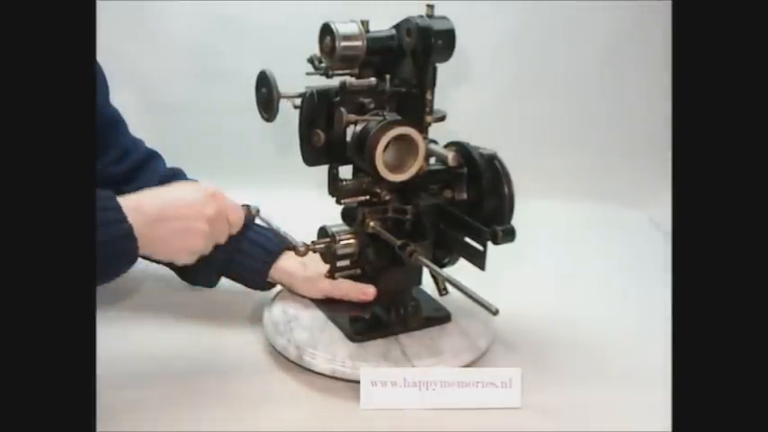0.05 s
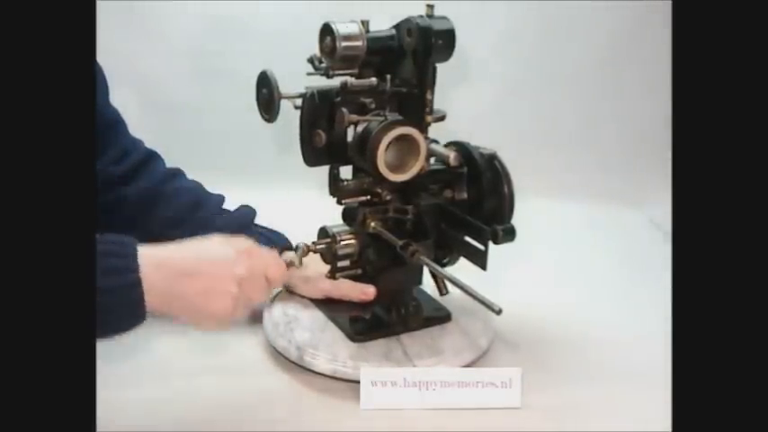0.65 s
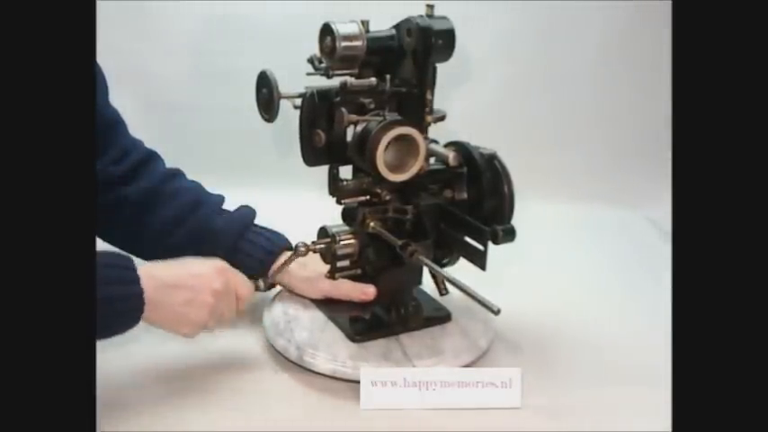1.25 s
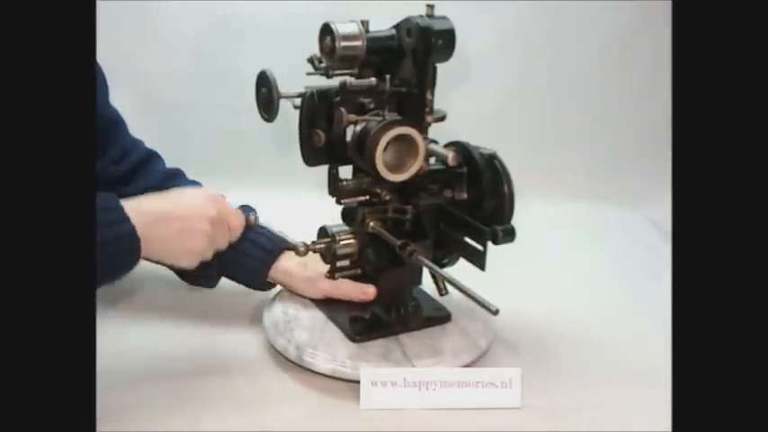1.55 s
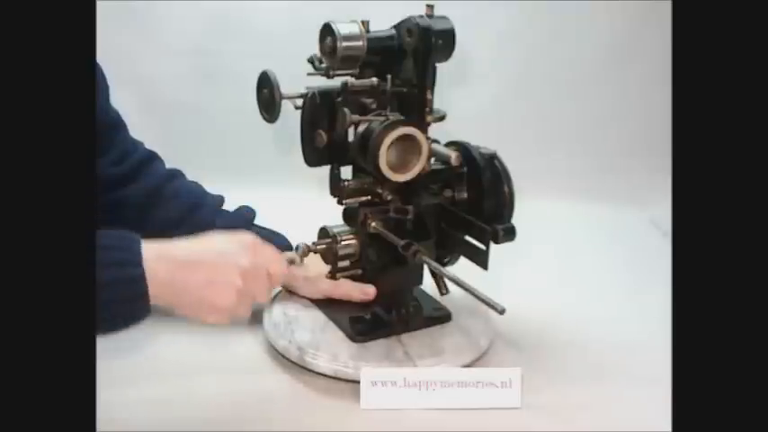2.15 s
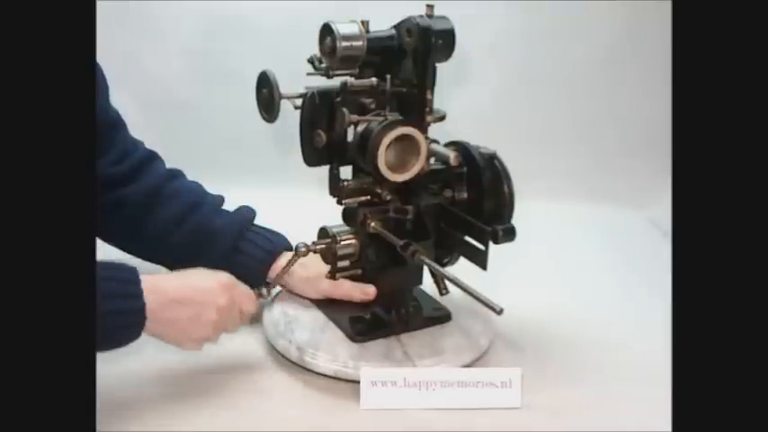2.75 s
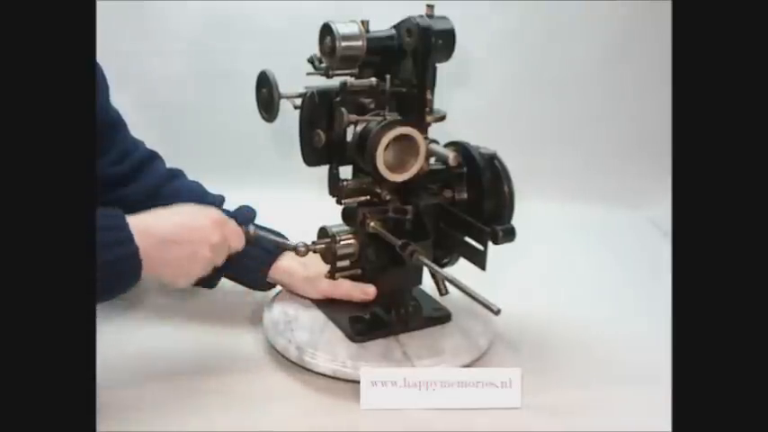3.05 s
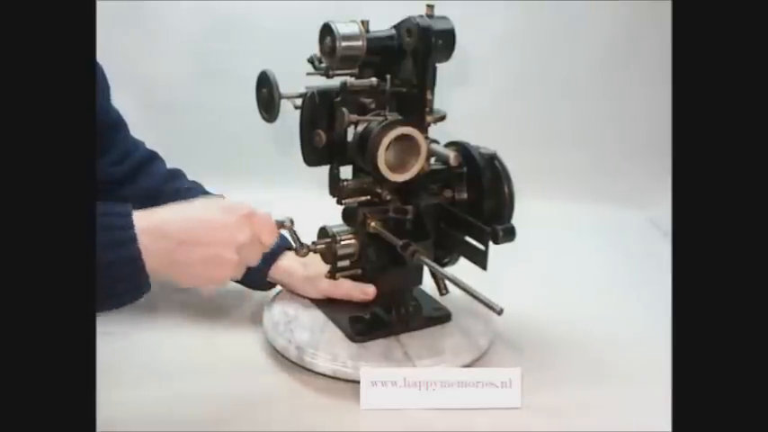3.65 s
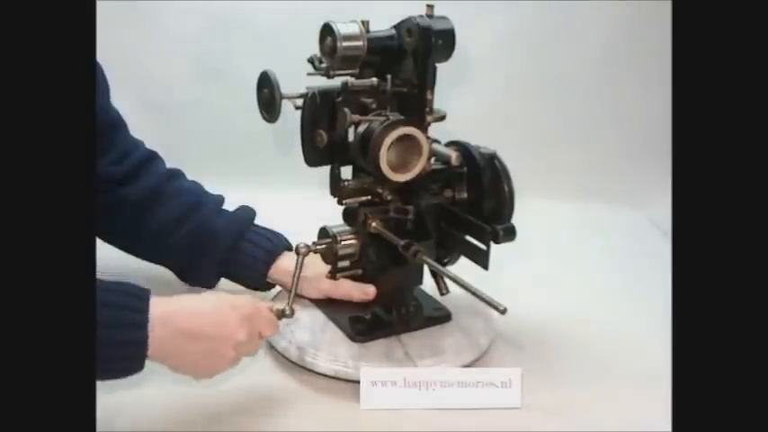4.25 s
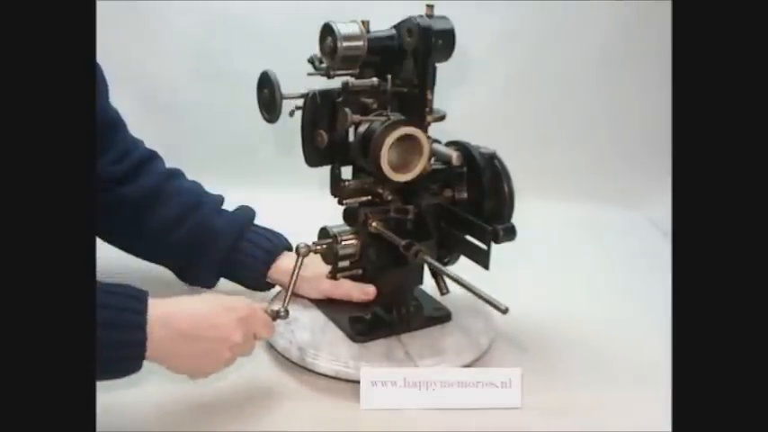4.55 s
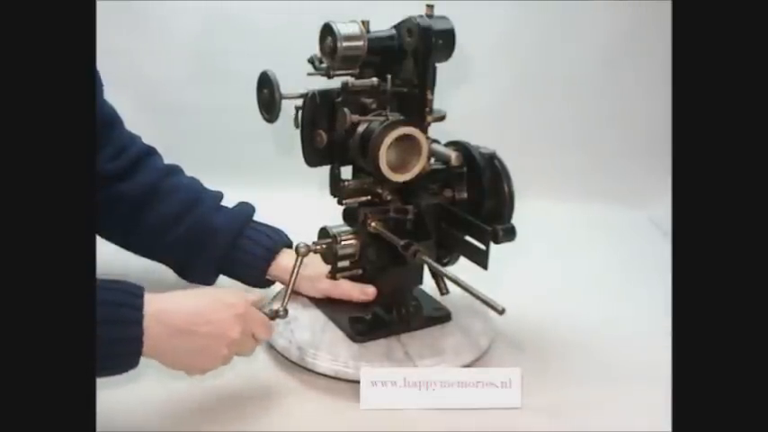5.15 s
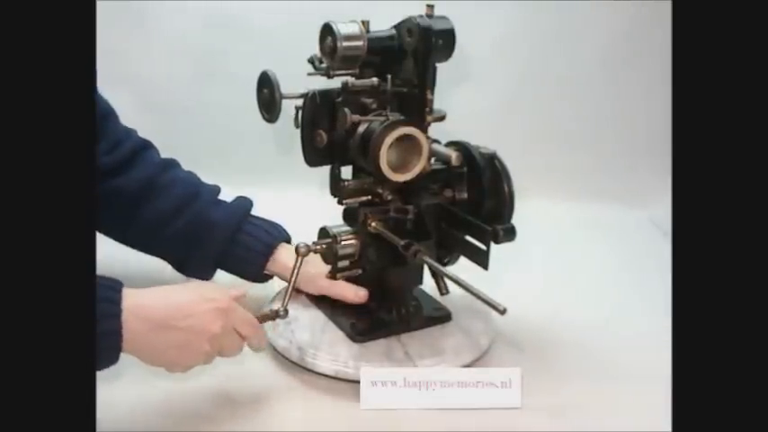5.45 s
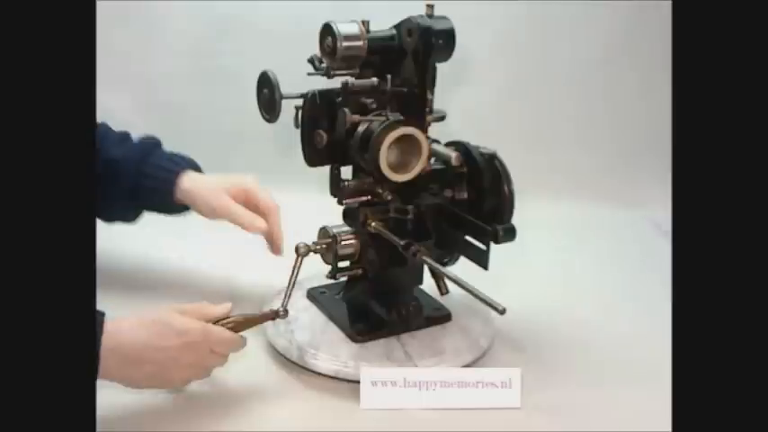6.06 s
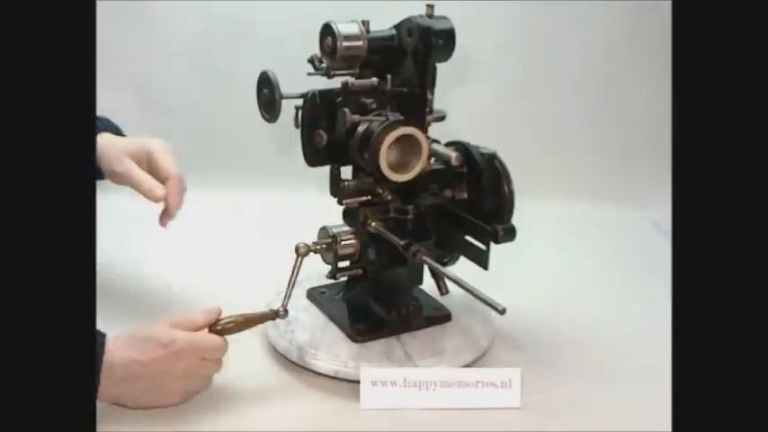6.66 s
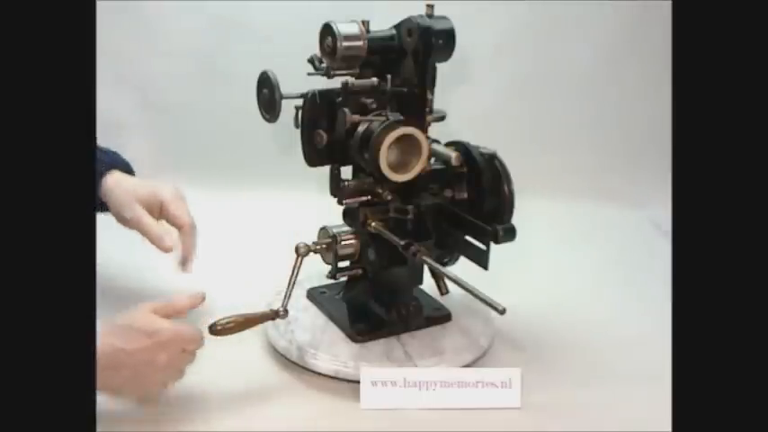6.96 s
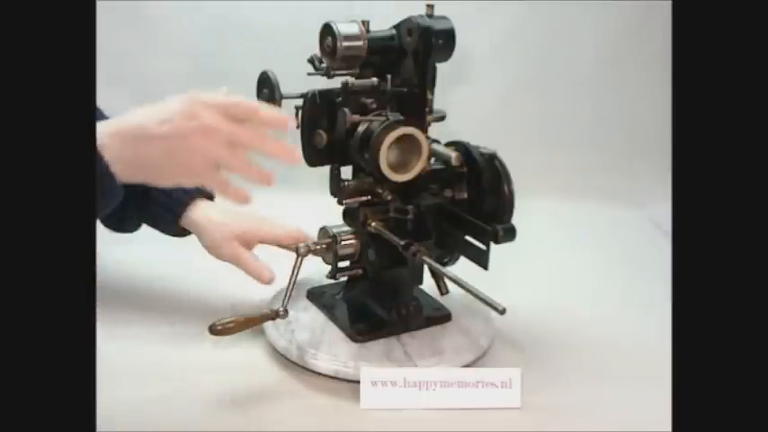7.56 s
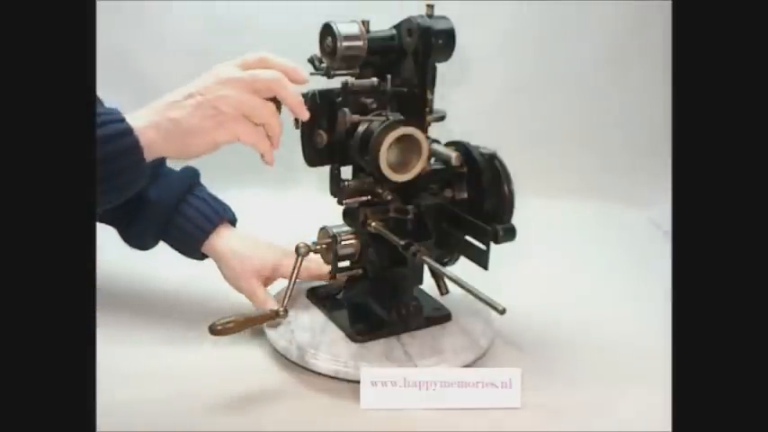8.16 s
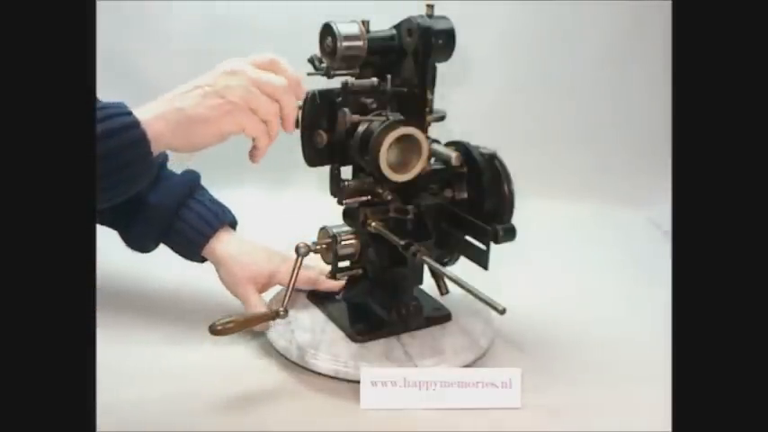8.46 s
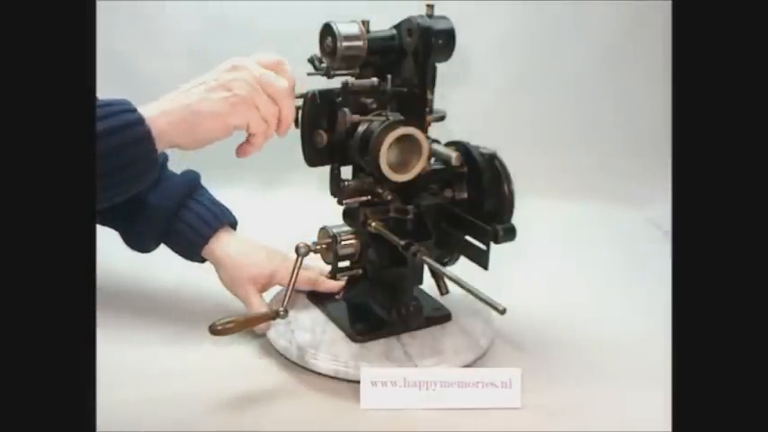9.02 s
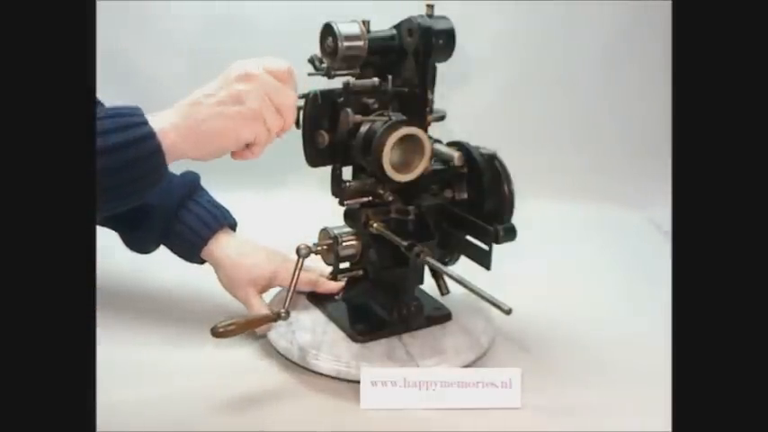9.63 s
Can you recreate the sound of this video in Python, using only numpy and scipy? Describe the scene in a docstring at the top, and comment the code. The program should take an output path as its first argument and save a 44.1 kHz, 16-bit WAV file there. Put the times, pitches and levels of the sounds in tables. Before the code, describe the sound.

Close up in a small room, an old hand-cranked projector runs with a surging gear whir and quick, even metallic ticking, its base thumping lightly as it rocks. The ticking slows and stops after about four seconds. A soft brush of skin and sleeve follows, then one sharper metal clack, several light taps and a late dull bump. Faint rumble, hiss, hum and a thin electronic whine lie underneath.

```python
"""Hand-cranked film projector

A cast-iron projector runs on a table in a small room. Gear teeth whir and rasp; five times a second
a pin ticks into the star wheel, which knocks on its lock. Once a crank turn a tight spot scuffs and
the base thumps. The machine runs down, then hands brush and tap it and let the gears rock in their
play. Under it all lie room rumble, hiss, a faint hum and a thin electronic whine."""
import sys
import numpy as np
from scipy import signal
from scipy.fft import rfft, irfft
from scipy.io import wavfile
from scipy.ndimage import uniform_filter1d

SR = 44100
rng = np.random.default_rng(int(sys.argv[2]) if len(sys.argv) > 2 else 0)


def log_audio(samples):
    """Write samples as a 16-bit WAV file to the path given in sys.argv[1]."""
    # one column per channel
    frames = np.atleast_2d(samples).T
    # limit to full scale, then quantise
    limited = np.clip(frames, -1, 1)
    pcm = np.round(limited * 32767).astype(np.int16)
    wavfile.write(sys.argv[1], SR, pcm)


N = 431738
TIME = np.arange(N) / SR
CUTOFF_HZ = 15720

# drive strokes: (time [s], tick [dB], knock [dB], lull depth [dB], surge height [dB])
STROKES = [(0.0912, -33, -45, 7.5, 1.5), (0.2924, -32.5, -46, 1, 3.0), (0.488, -37, -41, 4.5, 7),
           (0.6863, -33.5, -41, 2, 6), (0.8844, -30.5, -45, 3, -0.5), (1.0773, -34.0, -38.5, 1.5, -0.5),
           (1.2726, -39, -37, 8, 3.5), (1.4764, -34, -36.5, 5.5, 6.5), (1.677, -32.0, -41.0, 4.5, 5),
           (1.8684, -33, -39.5, 1.0, -1), (2.0552, -35.5, -37.5, 5, 1), (2.242, -33, -37.5, 1.5, 3.5),
           (2.4239, -31.5, -37.5, 3.5, 4), (2.601, -38.0, -37.5, -0.5, 2.5), (2.7866, -38.0, -38, 4.5, 6),
           (2.9878, -35, -36, 2, -3), (3.2048, -35.5, -38, 7.5, 5.5), (3.4227, -34.5, -41, 5, 8.0),
           (3.6359, -33.5, -42, 7, 5), (3.8526, -36, -36.5, 6, -2.5), (4.08, -38.5, -43, -1, 4),
           (4.3452, -43, -48.0, 3, -4)]
# iron frame: (frequency [Hz], width [Hz], gear-driven level [dB], knock-driven level [dB])
FRAME_MODES = [(148, 50, -23.5, -30), (256, 27, -15, -19), (362.5, 36, -9.5, -17), (435.5, 30.4, 4.5, 3.5),
               (475.4, 45.5, 4, 6.5), (604.5, 19, -7, 0), (683, 13.5, -10.5, 1), (774, 27.4, 2, 3.5),
               (841.6, 27.6, 4.5, 7.5), (894, 23.4, 1, -14), (929.3, 17.4, 2.5, 2), (1050, 45, -8, 6),
               (1152, 23, -15.5, -2.5), (1198, 29, -27, -22), (1396, 29, -12.5, -2.5), (1470, 28, -11, 4),
               (1548, 41, -15.5, 3), (1656, 113, -17, -5.5), (1954, 83, -13.5, -10.5), (2140, 52, -14, -2),
               (2237, 44, -8.5, -2), (2290, 36, -20, -19), (2614, 30, -13.5, -34), (3657, 26, -18, -24),
               (4492, 66, -19, -12)]
# dense small resonances under a knock: (frequency [Hz], relative density [dB])
KNOCK_SPECTRUM = [(100, -26), (300, -9), (1000, 1), (2200, 1), (3300, -8), (5000, -17.5), (7000, -24),
                  (15000, -45.5)]


def from_db(db):
    """Decibels to gain."""
    return 10 ** (np.asarray(db) / 20)


def unit_power(x):
    """Scale to unit power."""
    return x / np.sqrt(np.mean(x ** 2) + 1e-20)


def even(x, span_s):
    """Hold unit power over a sliding span."""
    return x / np.sqrt(np.abs(uniform_filter1d(x ** 2, int(span_s * SR))) + 1e-12)


def drift(per_s):
    """Random wander, spread near 1."""
    return np.interp(TIME * per_s, np.arange(2000), rng.standard_normal(2000))


def add(track, start_s, sound):
    """Mix a sound in at a time."""
    at = int(np.clip(start_s * SR, 0, N - 1))
    track[at:at + len(sound)] += sound[:N - at]


def through(x, response):
    """Convolve with a response scaled to unit energy."""
    return signal.oaconvolve(x, response / np.linalg.norm(response))[:N]


def ring(x, modes, order=1):
    """Parallel damped modes of alternating sign; order 2 gives a softer swell and steeper skirts."""
    t, response = TIME[:SR // 2], 0
    for k, (hz, width_hz, db) in enumerate(modes):
        decay = np.pi * width_hz * np.sqrt(order)
        envelope = decay * (decay * t) ** (order - 1) * np.exp(-decay * t)
        response = response + (-1) ** k * from_db(db) * envelope * np.sin(2 * np.pi * hz * t)
    return through(x, response)


def colour(x, spectrum, size=8192):
    """Minimum-phase filter with the given spectral shape."""
    hz, db = np.transpose(spectrum)
    grid_hz = np.maximum(np.arange(size // 2 + 1) * SR / size, 1)
    magnitude = from_db(np.interp(np.log(grid_hz), np.log(hz), db))
    cepstrum = irfft(np.log(magnitude))
    cepstrum[1:size // 2] *= 2
    cepstrum[size // 2 + 1:] = 0
    return through(x, irfft(np.exp(rfft(cepstrum))))


def soften(x, cutoff_hz):
    """A soft contact carries little treble."""
    return signal.sosfilt(signal.butter(2, cutoff_hz, fs=SR, output="sos"), x + 1e-18)


def grains(per_s, spread_db):
    """Tiny random impacts of uneven size; unit power."""
    sizes = from_db(spread_db * np.minimum(rng.exponential(1, N), 4))
    signs = rng.choice([-1, 1], N)
    return unit_power(sizes * signs * (rng.random(N) < per_s / SR))


def blow(crack_db, t60_s):
    """One contact: a click, then decaying chatter."""
    t = TIME[:SR // 4]
    force = rng.standard_normal(len(t)) * from_db(-60 * t / t60_s)
    force[0] += from_db(crack_db)
    return force


def blows(rows, crack_db, t60_s):
    """Force of a series of contacts: (time [s], level [dB])."""
    force = np.zeros(N)
    for start_s, db in rows:
        add(force, start_s, from_db(db) * blow(crack_db, t60_s))
    return force


def room(x, t60_s=0.15, tail_db=-3, onset_s=0.0077):
    """Direct sound, near echoes and a short diffuse tail."""
    # near walls and table top: (delay [s], level [dB])
    echoes = [(.0062, -14.5), (0.011, -6.5), (0.014, -12.5), (0.0216, -19.5)]
    t = TIME[:SR // 2]
    tail = rng.standard_normal(len(t)) * from_db(-60 * t / t60_s) * (1 - np.exp(-t / onset_s))
    response = from_db(tail_db) * tail / np.linalg.norm(tail)
    response[0] = 1
    for delay_s, db in echoes:
        response[int(delay_s * SR)] += from_db(db)
    return through(x, response)


def background(floor_db=-67.28, hum_hz=121, hum_rms_db=-82.5, whine_hz=256):
    """Room rumble, hiss, hum and a whine whose partials are in phase, like a train of tiny spikes."""
    # still room and hiss: (frequency [Hz], relative density [dB])
    floor_spectrum = [(12, -44), (20, 0), (49, -2), (90, -4.5), (112, -1.5), (144, -6.5), (298, -8),
                      (400, -11), (560, -11.5), (760, -17), (1200, -20), (2500, -22), (5230, -20.5),
                      (9660, -18.5), (15500, -24.5)]
    # envelope of the whine's partials: (frequency [Hz], RMS level [dB])
    whine_spectrum = [(7000, -98), (7680, -89), (7936, -100), (9216, -88), (9728, -84), (9984, -84),
                      (10400, -84.5), (11264, -97), (11520, -88), (12900, -87), (13400, -88), (13824, -88),
                      (14850, -99), (15600, -85.5)]
    hz, db = np.transpose(whine_spectrum)
    partials_hz = whine_hz * np.arange(np.ceil(hz[0] / whine_hz), CUTOFF_HZ / whine_hz)
    whine = sum(from_db(np.interp(f, hz, db)) * np.cos(2 * np.pi * f * TIME) for f in partials_hz)
    hum = from_db(hum_rms_db) * np.sin(2 * np.pi * hum_hz * TIME)
    floor = from_db(floor_db) * colour(rng.standard_normal(N), floor_spectrum)
    return floor + np.sqrt(2) * (whine + hum)


def stroke_count():
    """Strokes made at each sample; integers fall on the ticks."""
    tick_s = np.array(STROKES)[:, 0]
    padded_s = np.r_[2 * tick_s[0] - tick_s[1], tick_s, 2 * tick_s[-1] - tick_s[-2]]
    return np.interp(TIME, padded_s, np.arange(len(padded_s)) - 1)


def tooth_load(strokes, stopping_s=(4.41, 4.65)):
    """Growl, ring and rasp gains: in each stroke the teeth go slack, then catch up in a surge."""
    # the hand's slow push: (time [s], low growl [dB], middle ring [dB], high rasp [dB])
    push = [(0.0, -49.0, -46.0, -54), (0.55, -51.0, -49.5, -55), (0.85, -50, -45.5, -54.5),
            (1.2, -47, -42.0, -53.5), (1.45, -52.5, -47.5, -54.5), (1.9, -48.5, -44, -54),
            (2.15, -48.5, -46.5, -53.5), (2.55, -49.5, -43.5, -54.5), (2.9, -50, -45, -56),
            (3.3, -52, -46, -55), (3.85, -50, -48.5, -56.5), (4.1, -51, -45, -56.5),
            (4.3, -59.5, -54.5, -67), (4.47, -60.5, -56, -69)]
    # response of growl, ring and rasp: (lull share [ratio], surge share [ratio])
    shares = [(0.93, 0.92), (0.65, 0.5), (1.0, 0.53)]
    push_s, *bands_db = np.transpose(push)
    push_gains = from_db([np.interp(TIME, push_s, db) for db in bands_db])
    row = np.clip(np.floor(strokes).astype(int), 0, len(STROKES) - 1)
    _, _, _, depth_db, height_db = np.transpose(STROKES)
    phase = strokes % 1
    lull_db = depth_db[row] * np.exp(-0.5 * ((phase - 0.51) / 0.11) ** 2)
    surge_db = height_db[row] * np.exp(-0.5 * ((phase - 0.7) / 0.088) ** 2)
    run_down = np.interp(TIME, stopping_s, [1, 0]) ** 2
    return push_gains * from_db(np.array(shares) @ [-lull_db, surge_db]) * run_down


def gears(teeth_per_stroke=32, wobble=0.035, bite_db=2, flutter_db=1.5, splits_hz=(650, 1300)):
    """Teeth mesh, rattle and rub; returns the frame's whir and the dry rasp."""
    strokes = stroke_count()
    growl_gain, ring_gain, rasp_gain = tooth_load(strokes) * from_db(flutter_db * drift(45))
    mesh_hz = teeth_per_stroke * np.gradient(strokes) * SR
    # uneven cranking makes the pitch wander
    teeth = np.cumsum(mesh_hz * (1 + wobble * drift(14))) / SR
    pulses = np.diff(np.floor(teeth), prepend=0) - mesh_hz / SR
    mesh = unit_power(pulses) * np.sqrt(np.mean(mesh_hz > 0))
    # pressure rises with every tooth
    bite = from_db(bite_db * np.cos(2 * np.pi * teeth))
    force = from_db(-2) * mesh + grains(per_s=1500, spread_db=2.94) * bite
    # each part of the train drives its own range of modes
    modes = np.array(FRAME_MODES)[:, :3]
    bands = np.split(modes, np.searchsorted(modes[:, 0], splits_hz))
    low, middle, high = [ring(force, band, order=2) for band in bands]
    whir = (from_db(0.5) * growl_gain * even(low, span_s=0.051)
            + from_db(0.15) * ring_gain * even(middle, span_s=0.061)
            + from_db(5) * rasp_gain * even(high, span_s=0.041))
    # dense small resonances under the teeth: (frequency [Hz], relative density [dB])
    rasp_spectrum = [(60, -13.5), (130, -7.5), (300, -1.5), (700, 0), (1200, 2), (1600, -1), (2300, 0.5),
                     (2900, -4), (4600, -6), (5800, -9.5), (6800, -20), (9000, -22.5), (15000, -26)]
    rubbing = from_db(6.5) * rasp_gain * bite * grains(per_s=3000, spread_db=2.37)
    return whir, colour(rubbing, rasp_spectrum)


def intermittent_drive(knock_lag_s=0.0099, bounce_lag_s=0.009):
    """The pin ticks into the star wheel, which knocks its lock and bounces; returns ring, dry clack."""
    # star wheel: (frequency [Hz], width [Hz], level [dB])
    star_modes = [(2560, 150, -18.5), (2785, 110, -8.5), (2880, 50, -5), (2999, 36, 7)]
    tick_s, tick_db, knock_db, _, _ = np.transpose(STROKES)
    knock_s = tick_s + knock_lag_s
    tick = blows(zip(tick_s, tick_db), crack_db=22.5, t60_s=0.025)
    knock = blows(zip(knock_s, knock_db), crack_db=18, t60_s=0.053)
    bounce = from_db(-5) * blows(zip(knock_s + bounce_lag_s, knock_db), crack_db=14.5, t60_s=0.069)
    short_tick = blows(zip(tick_s, tick_db), crack_db=22.5, t60_s=0.0034)
    clack = colour(from_db(-5) * tick + from_db(-1.5) * knock + bounce, KNOCK_SPECTRUM)
    clink = ring(short_tick + from_db(-0.5) * knock + bounce, star_modes)
    frame = ring(knock + from_db(-12) * tick, np.array(FRAME_MODES)[:, [0, 1, 3]])
    return from_db(-5.5) * clink + from_db(5) * frame, clack


def once_a_turn(first_stroke, turns=5, strokes_per_turn=4):
    """Times [s] of the same stroke in successive crank turns."""
    return np.array(STROKES)[first_stroke::strokes_per_turn, 0][:turns]


def scuffs(lead_s=0.028, level_db=-41):
    """A tight spot in the gears scuffs once a turn, just ahead of a stroke."""
    # scuffed gear: (frequency [Hz], width [Hz], level [dB])
    gear_modes = [(1500, 150, -19), (1650, 120, -1.5), (2220, 340, -6)]
    contacts = [(s - lead_s, level_db) for s in once_a_turn(first_stroke=2)]
    contacts.append((4.211, -45.5))  # once more as the hand eases off
    return ring(blows(contacts, crack_db=19.5, t60_s=0.16), gear_modes)


def thumps(lag_s=0.025, thump_db=-42.5, rock_back_db=-53, rebound_s=0.0355, rebound_db=-8):
    """The base rocks to and fro once a turn, settling each time; later the table takes soft bumps."""
    # base on its stand: (frequency [Hz], width [Hz], level [dB])
    base_modes = [(129, 36, -9), (159.6, 17, 10), (270, 37, -11)]
    # table: (frequency [Hz], width [Hz], level [dB])
    table_modes = [(29, 7.6, 11), (49, 17, 2.5), (99, 7.2, 6.5), (160, 23, -9), (290, 120, -20.5)]
    # bumps against the table: (time [s], level [dB])
    bumps = [(8.04, -71), (8.11, -66), (9.67, -48), (9.718, -46.5)]
    contacts = [(s + lag_s, thump_db) for s in once_a_turn(first_stroke=3)]
    contacts += [(s + lag_s, rock_back_db) for s in once_a_turn(first_stroke=4, turns=4)]
    rock = blows(contacts, crack_db=22.5, t60_s=0.0022)
    settle = blows(np.array(contacts) + [rebound_s, rebound_db], crack_db=25, t60_s=0.0017)
    bump = blows(bumps, crack_db=33.5, t60_s=0.002)
    return ring(rock + settle, base_modes) + ring(bump, table_modes)


def backlash():
    """Slack teeth meet softly and ring the frame; a light pinion hardly moves its lowest modes."""
    # teeth meeting across their play: (time [s], level [dB], low cut [Hz])
    contacts = [(4.218, -37.5, 750), (4.346, -46, 650), (4.359, -50, 650), (5.248, -59, 505),
                (5.2577, -51, 640), (9.683, -52.5, 403), (9.69, -53, 397)]
    force = np.zeros(N)
    for start_s, db, low_cut_hz in contacts:
        contact = soften(blow(crack_db=22.5, t60_s=0.0055), cutoff_hz=1080)
        low_cut = signal.butter(2, low_cut_hz, "high", fs=SR, output="sos")
        add(force, start_s, from_db(db) * signal.sosfilt(low_cut, contact))
    frame = ring(force, np.array(FRAME_MODES)[:, :3])
    clack = room(colour(force, KNOCK_SPECTRUM))
    return from_db(8) * frame + from_db(1) * clack


def brushing():
    """Skin and sleeve slide over the casting in swells of tiny impacts."""
    # slides: (start [s], level [dB], length [s])
    slides = [(5.465, -54, 0.073), (5.53, -66, 0.16), (5.853, -64.5, 0.048), (7.048, -70, 0.095),
              (8.082, -68.5, 0.059)]
    # dense small resonances under a slide: (frequency [Hz], relative density [dB])
    brush_spectrum = [(120, -18), (300, 5.5), (700, -2), (1600, -1), (2600, -10), (4000, -8), (6500, -18),
                      (15000, -18)]
    envelope = np.zeros(N)
    for start_s, db, length_s in slides:
        age = np.maximum(TIME - start_s, 0) / length_s * np.e
        envelope += from_db(db) * (age * np.exp(1 - age)) ** 2
    return colour(envelope * grains(per_s=4000, spread_db=2.96), brush_spectrum)


def taps():
    """Each tap strikes, crunches and shakes loose parts; returns the housing's ring, dry chatter."""
    # hand and crank handle on the machine: (time [s], level [dB], treble cutoff [Hz])
    contacts = [(5.866, -64.5, 4000), (6.067, -41, 7600), (6.0715, -40, 379), (6.0741, -49, 3500),
                (6.0821, -44, 380), (6.332, -46.5, 377), (7.064, -71, 4000), (7.239, -67.5, 2000),
                (7.3602, -55.5, 3700), (7.365, -59, 1900), (7.452, -61, 2400), (7.714, -66, 4000)]
    # crank and housing: (frequency [Hz], width [Hz], level [dB])
    housing_modes = [(290, 18, 2.5), (372, 63, 4.5), (660, 54, -10), (730, 32, 0), (1100, 78, -12),
                     (1200, 30, 7), (1380, 36, 4), (1530, 77, -8), (1940, 39, -10), (2120, 22, 6),
                     (2500, 140, -18), (2900, 60, -3), (3840, 310, -4.5)]
    # dense small resonances under a tap: (frequency [Hz], relative density [dB])
    tap_spectrum = [(70, -25), (160, -13), (240, -8), (370, -2), (500, -6), (750, -3), (1250, -2.5),
                    (2300, -3.5), (3100, -8.5), (4100, -11), (5500, -16), (7000, -28), (15000, -33)]
    strikes, chatter = np.zeros((2, N))
    for start_s, db, cutoff_hz in contacts:
        strike = blow(crack_db=21, t60_s=0.0015)
        crunch = from_db(1) * blow(crack_db=0, t60_s=0.012)
        loose_parts = blow(crack_db=1, t60_s=0.055)
        add(strikes, start_s, from_db(db) * soften(strike, cutoff_hz))
        add(chatter, start_s, from_db(db) * soften(crunch + loose_parts, cutoff_hz))
    return from_db(0.5) * ring(strikes, housing_modes), from_db(3) * colour(chatter, tap_spectrum)


def scene():
    """Mono mix: the iron rings directly, the sharp sounds scatter round the room."""
    whir, rasp = gears()
    drive_ring, clack = intermittent_drive()
    housing_ring, chatter = taps()
    sharp = room(rasp + clack + chatter + brushing() + scuffs())
    return (whir + drive_ring + housing_ring + backlash() + thumps() + sharp + background())[None]


def record(dry):
    """Steep low-pass."""
    return signal.sosfilt(signal.ellip(12, 0.1, 80, CUTOFF_HZ, fs=SR, output="sos"), dry)


dry = scene()
out = record(dry)
log_audio(out)
```